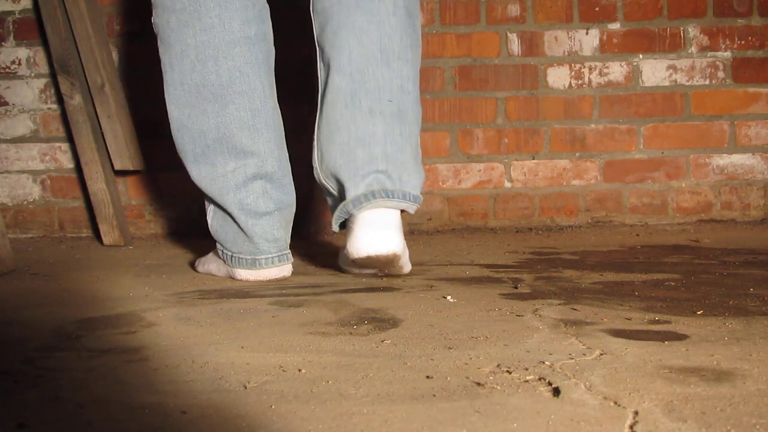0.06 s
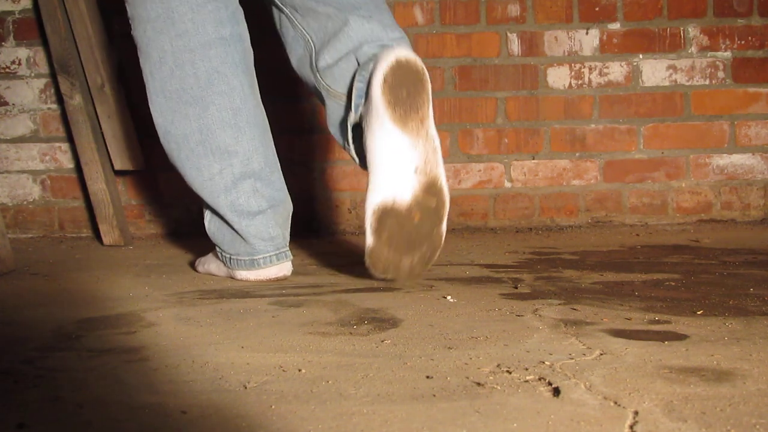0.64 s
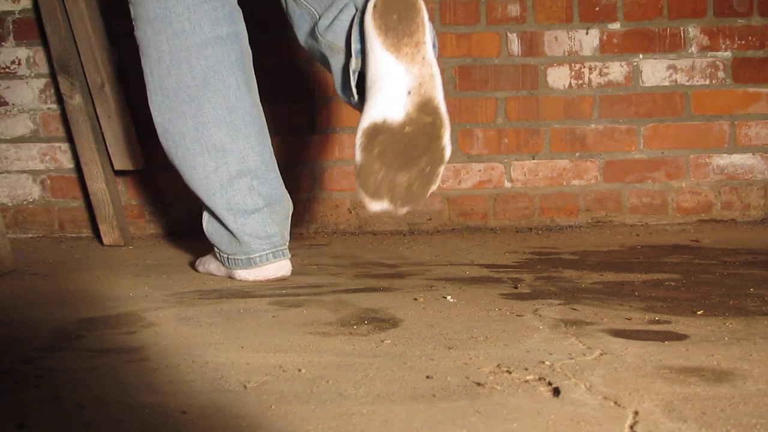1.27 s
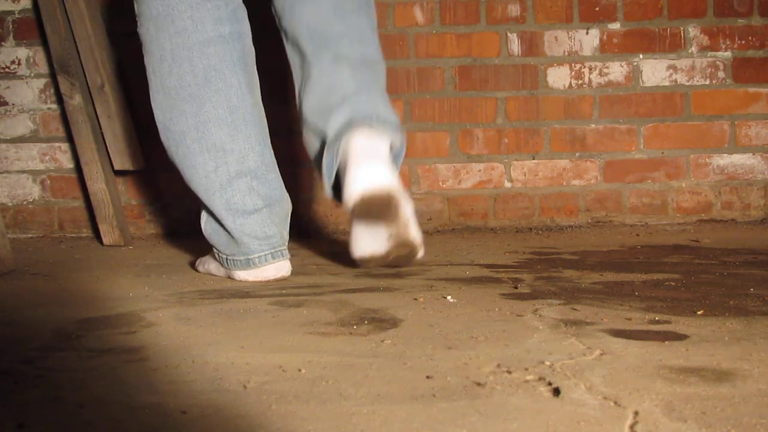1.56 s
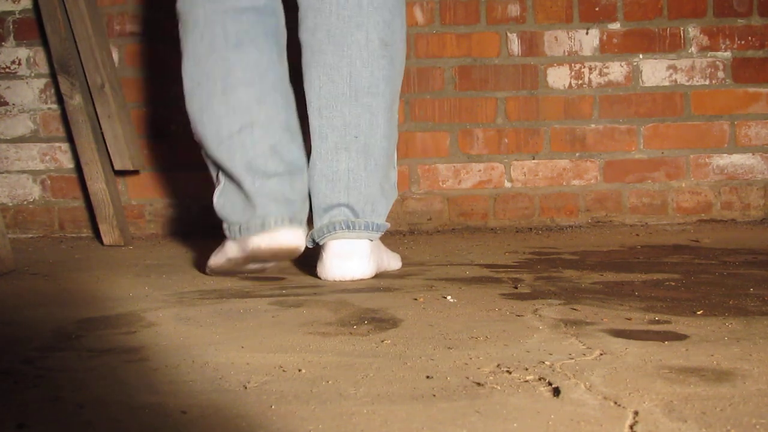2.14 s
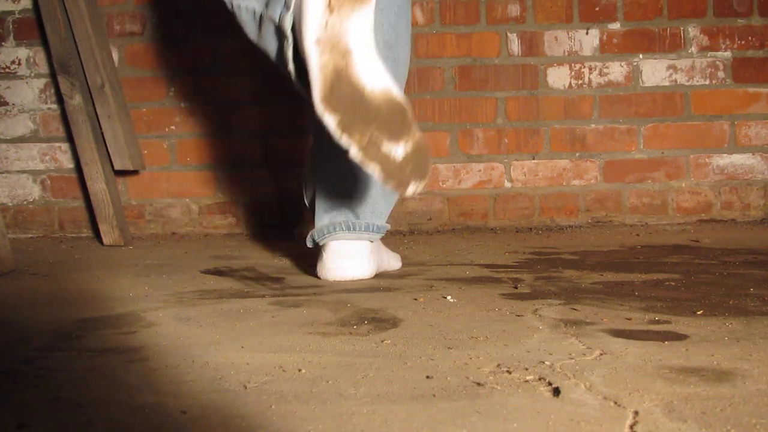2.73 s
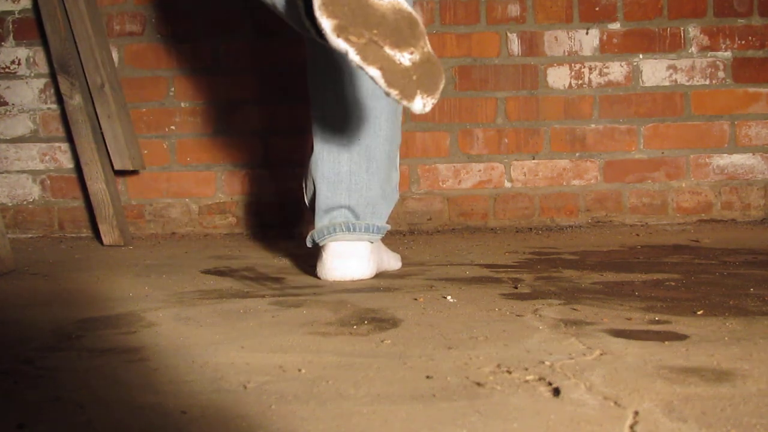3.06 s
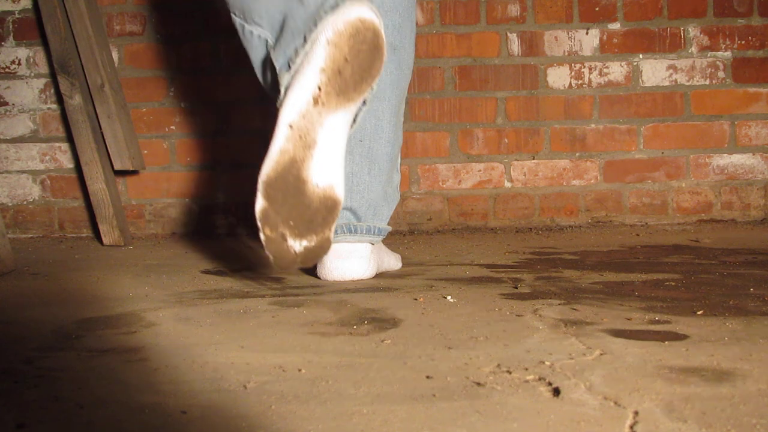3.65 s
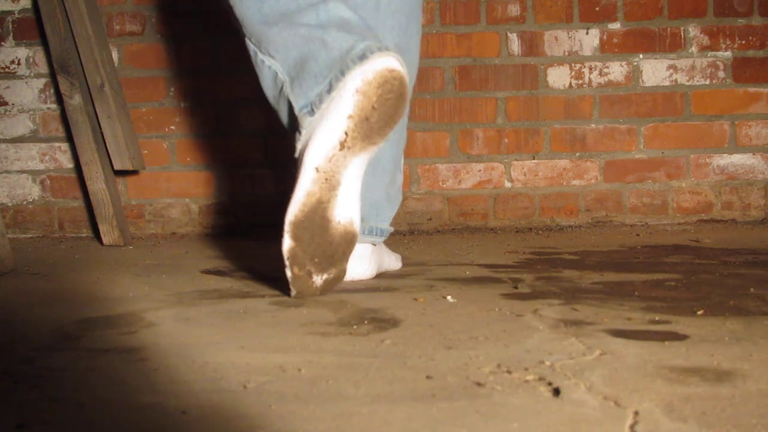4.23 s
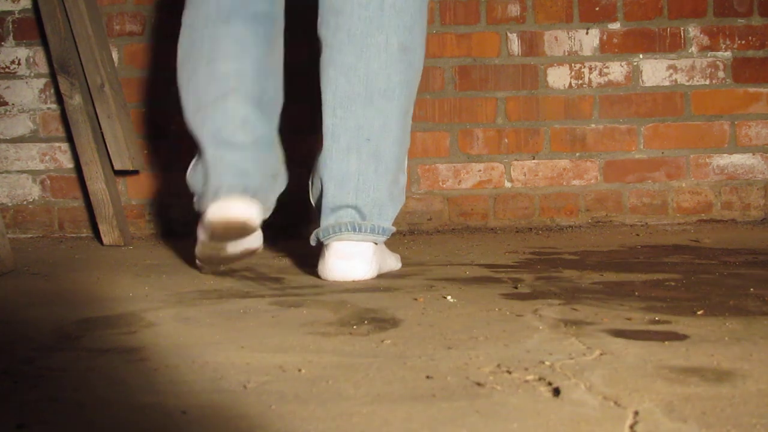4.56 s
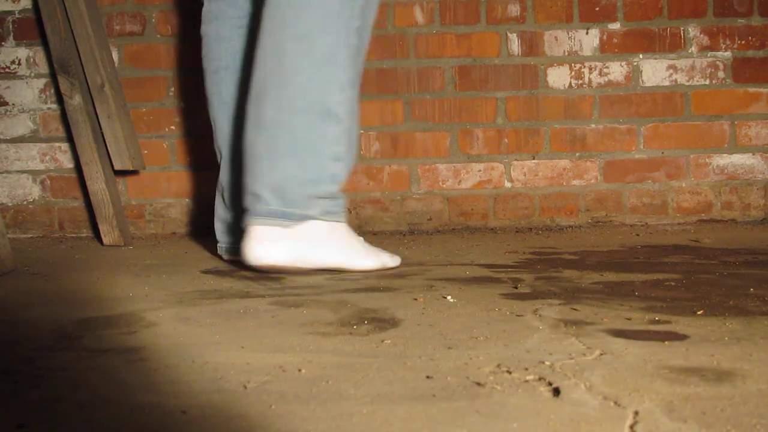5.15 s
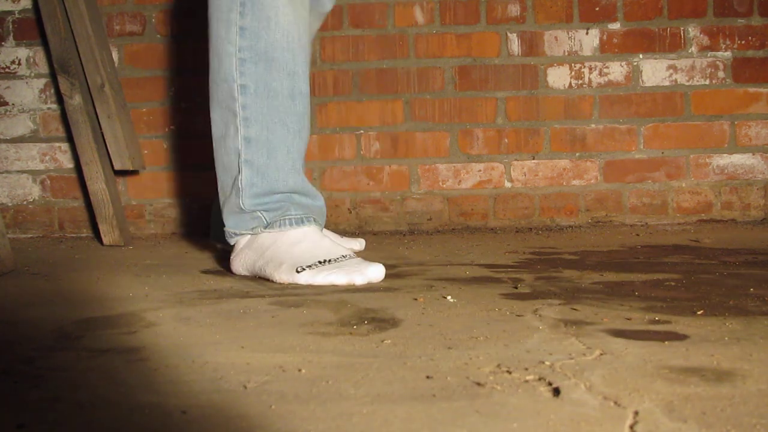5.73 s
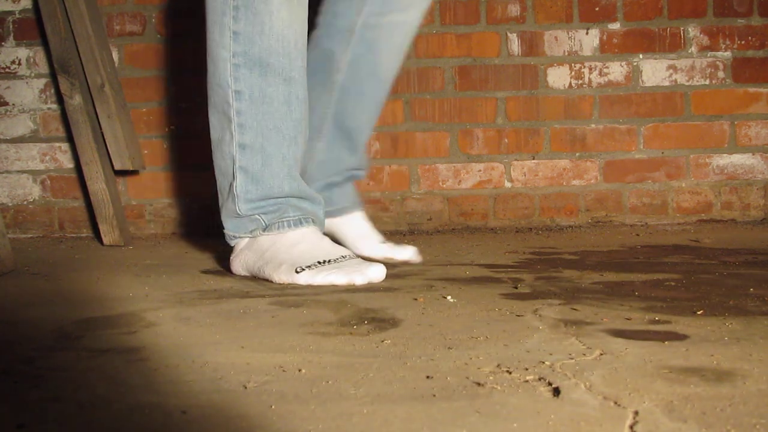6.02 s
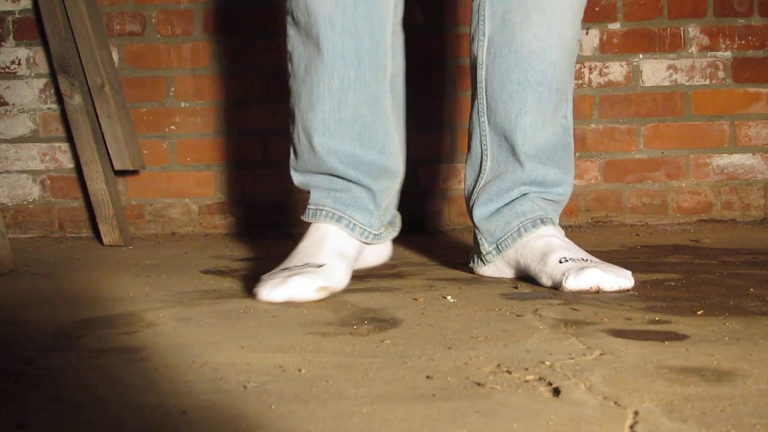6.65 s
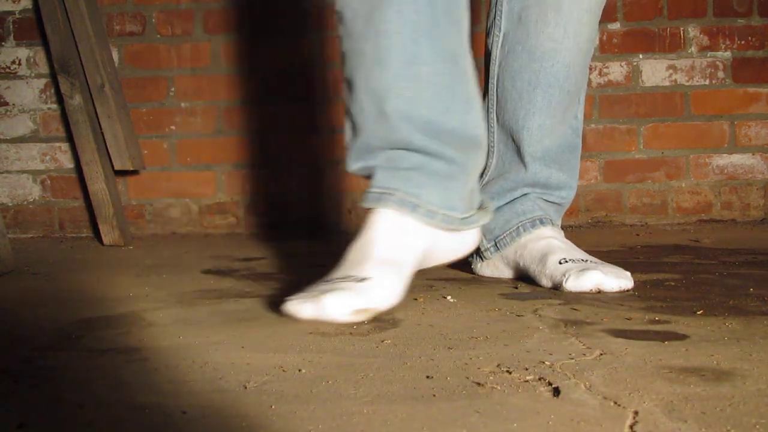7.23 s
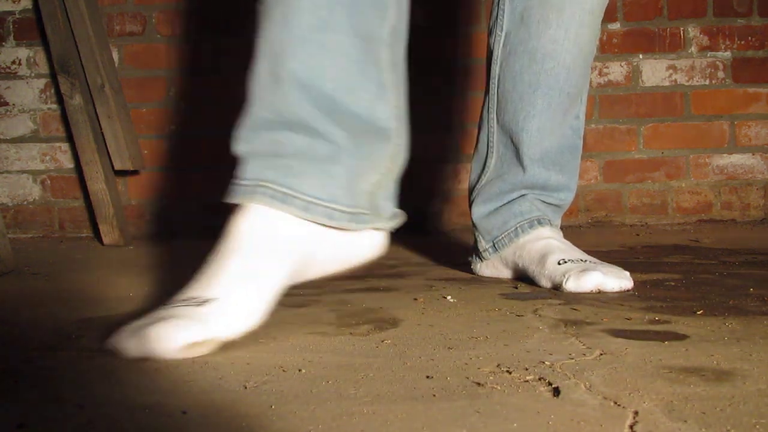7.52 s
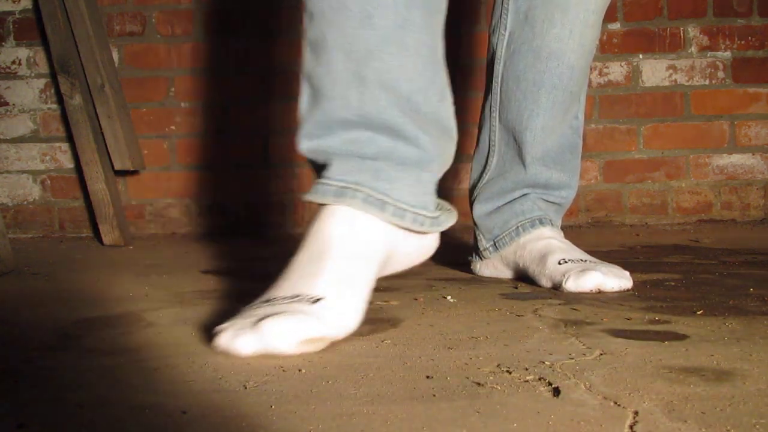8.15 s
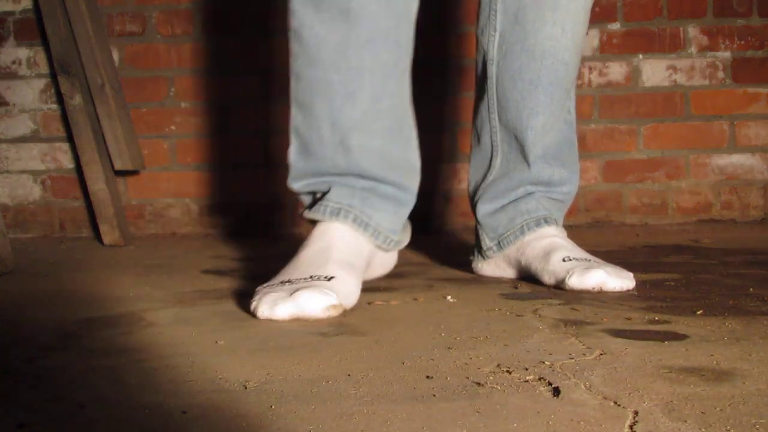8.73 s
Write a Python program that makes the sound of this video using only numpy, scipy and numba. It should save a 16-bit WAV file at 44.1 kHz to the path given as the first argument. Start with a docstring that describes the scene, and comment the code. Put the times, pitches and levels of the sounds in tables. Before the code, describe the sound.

Socked feet wipe and scuff over a dusty concrete floor in a small brick room. A few soft slides come first, with one sharp snap of grit and a louder scrape. After a lull of faint denim rustling, light scuffing steps build into a run of sandy strokes to and fro. The feet sound close, with a short ring from the walls and a fan droning faintly behind.

```python
"""Socked feet scuff over dusty concrete in a small brick room: wipes and steps, then strokes to and fro.
Cloth drags on the rough floor as countless tiny slips, coloured by the hollow gap under the foot.
Sand crunches under the sole, a grain snaps, and denim brushes as the legs swing.
A fan drones faintly behind, and the bare walls add a short ring."""
import sys
import numpy as np
from scipy import signal
from scipy.fft import rfft, irfft
from scipy.io import wavfile
from numba import njit

SR = 44100
rng = np.random.default_rng(int(sys.argv[2]) if len(sys.argv) > 2 else 0)


def digitize_waveform(pressure):
    """Quantize a signal to 16-bit integers and store it at the path in sys.argv[1].

    Rows of a 2-D input are taken as channels; values are limited to [-1, 1].
    """
    field = np.atleast_2d(pressure).T
    bounded = np.clip(field, -1, 1)
    quanta = np.round(bounded * 32767).astype(np.int16)
    wavfile.write(sys.argv[1], SR, quanta)


N = 396459
T = np.arange(N) / SR
FREQS = np.fft.rfftfreq(N, 1 / SR) + 1e-3
OPPOSED = np.array([[1], [-1]])  # side signal: plus on the left, minus on the right

# room tone EQ, mid and side: frequency_hz, gain_db
AIR_MID_EQ = [(25, -40.5), (170, -3.5), (500, -0.5), (700, 2.5), (1000, -2), (1550, -5.5), (2050, -4),
              (3100, -9.5), (4200, -17.5), (5400, -15.5), (6600, -21.5), (8300, -15), (11000, -20),
              (15400, -32)]
AIR_SIDE_EQ = [(25, -50), (80, -18), (170, -4.5), (300, -2), (700, -2), (1500, -6), (2100, -10),
               (3100, -16.5), (4200, -28), (5400, -25), (6600, -29), (8400, -25.5), (15400, -37)]
# tones of the fan's drone: pitch_hz, width_hz, level_db
FAN_TONES = [(403.7, 17.5, -64.5), (614, 20, -65.5), (807.6, 13.5, -64.5), (1095, 41, -66), (1349, 22, -72)]
# denim and sock brushing as a leg swings or turns: centre_s, length_s, level_db
LEG_SWISHES = [(.48, .09, -61), (1.39, .22, -69), (3.43, .22, -66.5), (4.294, .03, -63), (4.76, .32, -66.5),
               (4.853, .065, -50.5), (7.645, .06, -63), (8.0, 0.17, -54)]
# soft cloth rustles, and the sock rubbing faintly on the floor between strokes:
# centre_s, length_s, level_db
SOFT_RUSTLES = [(.47, .1, -55), (.72, .12, -54.5), (1.36, .22, -64), (1.88, 0.42, -56.5),
                (2.75, 0.28, -63.5), (4.78, 0.83, -60.5), (5.8, .16, -58), (6.25, .08, -53.5),
                (7.0, .1, -52.5), (8.0, .12, -54), (8.88, 0.49, -60)]
# soft bumps of leg and foot: centre_s, length_s, level_db
LEG_BUMPS = [(.8, .17, -63), (3.91, 0.13, -66), (6.34, .089, -69)]
# single grains snapping: start_s, peak_db
GRAIN_SNAPS = [(1.475, -43), (1.7725, -20), (1.774, -22.5), (1.7845, -42)]
# ring of a snapped grain: pitch_hz, width_hz, gain_db
GRAIN_RING = [(9200, 340, 6), (9900, 350, -4), (11400, 440, 0), (13400, 500, -15)]
# colour of cloth on concrete: frequency_hz, gain_db
CLOTH_EQ = [(40, -57), (200, -28.5), (450, -15.5), (850, -6), (1250, -3.5), (2000, -2), (2600, -2.5),
            (3300, -3), (4250, -9.5), (5350, -2.5), (6600, -12.5), (8000, -5), (9300, -5.5), (12300, -13),
            (15500, -30.5)]
# the sole catches and rasps briefly: centre_s, length_s, level_db
SOLE_CATCHES = [(.648, 0.032, -46.5), (1.663, 0.088, -43.5), (2.331, 0.0032, -35), (2.353, .016, -35),
                (2.385, .009, -23), (2.416, 0.031, -29.5), (5.26, .11, -49), (6.188, 0.077, -39.5)]
# slides of a sole: start_s, length_s, level_db, growth_db, sand_db, weight_db, brighten_db,
# lower_hz, upper_hz, ring_strength
# Growth and brightening run from landing to lifting; sand and weight trim the treble and the body.
# The last three are the resonances of the gap under the foot.
SOLE_SLIDES = [ (-.095, 0.24, -38.5, -20, -7, -3, -13, 1020, 1820, .9),
               (.03, .457, -42.6, -1, -5, -2.5, -1, 870, 2010, .4),
               (.484, 0.19, -46.4, 2.5, 1.5, -3, 1, 1030, 2000, .4),
               (1.607, .25, -48.8, -21.5, -4, 4, -6, 1060, 2230, 0.86),
               (2.004, 0.36, -35, 14.5, -4.5, -3.5, 4, 1150, 1920, .6),
               (2.314, 0.21, -30, 1.5, -2, -5, 4, 1100, 2260, 1.17),
               (2.43, 0.088, -42.5, -2, 7, -8, -1, 1240, 2200, .4),
               (4.508, .13, -50.4, -7.5, 2, -20, -12, 1110, 2180, 0.078),
               (5.0, .109, -55, -3, -.6, -2, -13, 1090, 1930, .4),
               (5.081, 0.33, -45.3, 5.5, -4.5, -11, -1, 1010, 2100, .2),
               (5.371, .14, -43.1, 4, -3, -13, -13, 1040, 2210, .4),
               (5.485, 0.14, -40.5, 2, -2, -2, -5, 1498, 2050, 1.4),
               (5.644, .121, -53.2, -11, -5.5, -6, -10, 1500, 1870, 1.3),
               (5.883, 0.18, -42.5, -1, -1.5, -12, 7, 950, 2010, 0.76),
               (6.026, 0.18, -41.1, 4.5, -2.2, -9, 2, 1070, 2020, .4),
               (6.267, .086, -44, 11, -4.5, -6.5, -17, 1160, 1830, .1),
               (6.361, 0.18, -51.5, 14, -1, -3, -2, 970, 2030, 1.0),
               (6.575, 0.24, -37.5, -13, -6.4, -4.5, -9, 1120, 1960, 1.0),
               (6.724, 0.25, -33.5, -6, 1.2, -7.5, -6.5, 980, 1790, 1.5),
               (7.012, .309, -35, 2.5, -6, -3.5, 5.5, 890, 1720, 0.99),
               (7.321, 0.28, -34, 9.5, -1.5, -6, 3, 1510, 2170, 0.86),
               (7.651, 0.31, -33, 8.5, -5, -.5, -3, 1472, 2140, 0.94),
               (8.032, 0.28, -34.7, 0.5, -1, -5.5, 2, 1360, 2020, .9),
               (8.259, 0.43, -34.5, 1.5, -5, 1, 2, 1200, 1890, 0.76),
               (8.653, 0.13, -44.5, -3.5, -3.5, -8, -6, 1030, 1680, 1.0)]


def undb(db):
    """Decibels to gain."""
    return 10 ** (np.asarray(db) / 20)


def unit(x):
    """Scale to rms 1."""
    return x / np.sqrt(np.mean(x ** 2))


def eq_curve(points):
    """Gain at every frequency from points of frequency_hz, gain_db."""
    hz, db = np.transpose(points)
    return undb(np.interp(np.log(FREQS), np.log(hz), db))


def filtered(x, gain):
    """Apply a frequency response."""
    return irfft(rfft(x) * gain, N)


def resonance(hz, width):
    """Response of one damped mode, gain 1 at its centre."""
    return 1 / (1 + 1j * (FREQS ** 2 - hz ** 2) / (FREQS * width))


def below(hz, order):
    """Smooth low-pass curve; one minus it is the matching high-pass."""
    return 1 / (1 + (FREQS / hz) ** order)


def noise():
    """White noise."""
    return rng.standard_normal(N)


def flutter(rate_hz):
    """Smooth random modulation, rms 1, rolling off above rate_hz."""
    return unit(filtered(noise(), below(rate_hz, order=4)))


def swells(rows):
    """Envelope of rounded swells from rows of centre_s, length_s, level_db."""
    return sum(undb(db) * np.cos(np.pi * np.clip((T - centre) / length, -.5, .5)) ** 2
               for centre, length, db in rows)


@njit
def swept_band(x, hz, width):
    """State-variable band-pass with a moving centre, gain 1 there."""
    out, band_state, low_state = np.empty(len(x)), 0., 0.
    for i in range(len(x)):
        tuning, damping = np.tan(np.pi * hz[i] / SR), width / hz[i]
        band = (band_state + tuning * (x[i] - low_state)) / (1 + tuning * (tuning + damping))
        band_state = 2 * band - band_state
        low_state += 2 * tuning * band
        out[i] = damping * band
    return out


def air_and_fan():
    """A bed of steady room tone and the rough drone of a distant fan."""
    mid = undb(-58) * unit(filtered(noise(), eq_curve(AIR_MID_EQ)))
    side = undb(-53) * unit(filtered(noise(), eq_curve(AIR_SIDE_EQ)))
    fan_mid, fan_side = [
        sum(undb(db) * unit(filtered(noise(), resonance(hz, width))) for hz, width, db in FAN_TONES)
        for _ in range(2)]
    return mid + fan_mid + OPPOSED * (side + undb(-1) * fan_side)


def brick_room(x, t60_low_s, t60_high_s, tail_db, early_db):
    """The floor and near bricks scatter the sound sideways; the walls ring briefly."""
    age = np.maximum(T - .004, 0)  # pre-delay
    low = below(4700, order=2)
    tails = [filtered(noise() * undb(-60 * age / t60_low_s), low)
             + filtered(noise() * undb(-60 * age / t60_high_s), 1 - low) for _ in range(2)]
    tail_mid, tail_side = unit(np.array(tails) * (age > 0)) / np.sqrt(N)
    scatter = unit(noise() * np.exp(-T / .006) * (T > .0005)) / np.sqrt(N)
    colour = eq_curve([(300, 4), (700, -8), (1400, -12), (2500, -6), (4500, -17), (8000, -1), (14000, 4)])
    early = undb(early_db) * rfft(scatter) * colour
    wet = undb(tail_db) * rfft(tail_mid + OPPOSED * undb(-7) * tail_side) + OPPOSED * early
    pan_right_db = np.interp(FREQS, [2000, 5000, 9000, 13000], [.1, 1.3, 2.9, 1.8])
    return filtered(x, undb(-OPPOSED * pan_right_db / 2) + wet)


def cloth_and_bumps():
    """Denim brushes, cloth rustles, the sock rubs faintly between strokes, and the legs bump dully."""
    cloth = eq_curve(CLOTH_EQ)
    swish = unit(filtered(noise(), cloth * (1 - below(2900, order=2))))
    rustle = unit(filtered(noise() * undb(3.1 * flutter(40)), cloth * below(3900, order=3)))
    thud = unit(filtered(noise(), resonance(hz=160, width=170) ** 2))
    return swish * swells(LEG_SWISHES) + rustle * swells(SOFT_RUSTLES) + thud * swells(LEG_BUMPS)


def grain_snaps():
    """A grain shoots from under the foot with a tiny, high ring."""
    clicks = np.zeros(N)
    for start, db in GRAIN_SNAPS:
        clicks[int(start * SR)] += undb(db)
    ring = sum(undb(db) * resonance(hz, width) for hz, width, db in GRAIN_RING)
    return filtered(clicks, ring / np.abs(irfft(ring, N)).max())


def sand_crackle(per_second, spread_db):
    """Crunching sand: random clicks of either sign, a few louder than the rest."""
    struck = rng.random(N) < per_second / SR
    size = undb(spread_db * np.minimum(rng.exponential(size=N), 4))
    return unit(struck * size * rng.choice([-1, 1], N))


def friction(sand_share, judder_db):
    """Fibres slip on concrete in a dense hiss while sand crackles; the sole's grip judders."""
    hiss = np.sqrt(1 - sand_share) * noise()
    crackle = np.sqrt(sand_share) * sand_crackle(per_second=5000, spread_db=1.5)
    contact = (hiss + crackle) * undb(judder_db * flutter(76))
    cloth = eq_curve(CLOTH_EQ)
    mids = (FREQS > 1265) & (FREQS < 3550)  # this band is set to about rms 1
    return filtered(contact, cloth / np.sqrt(np.mean(cloth ** 2 * mids)))


def hollow(x, lower_hz, upper_hz, strength):
    """Two broad, gliding resonances of the gap under the foot colour the scuff."""
    ring = swept_band(x, lower_hz, width=234.0) * 0.77 + swept_band(x, upper_hz, width=247.0)
    return (x + strength * ring) / np.sqrt(1 + 0.29 * strength * (2 + strength))


def footwork(body_power, rasp_power, sand_power, gap_glide):
    """Each layer follows load and a power of speed; the stronger of overlapping slides leads the gap."""
    body, rasp, sand, lower, upper, ring = np.zeros((6, N))
    for (start, length, db, growth_db, sand_db, weight_db, brighten_db,
         lower_hz, upper_hz, strength) in SOLE_SLIDES:
        place = np.clip((T - start) / length, 0, 1) - .5  # -.5 at landing, .5 at lifting
        speed = 1 - (2 * place) ** 2
        load_db, tilt_db = db + growth_db * place, brighten_db * place
        rubbing = speed ** rasp_power * undb(load_db)
        rasp += rubbing
        body += speed ** body_power * undb(load_db + weight_db - tilt_db)
        sand += speed ** sand_power * undb(load_db + sand_db + tilt_db)
        glide = 1 + gap_glide * (speed - 1)  # the gap's pitch rises with speed
        lower += rubbing * glide * lower_hz
        upper += rubbing * glide * upper_hz
        ring += rubbing * strength
    sliding = rasp > 0
    gap = [np.interp(T, T[sliding], total[sliding] / rasp[sliding]) for total in (lower, upper, ring)]
    return body, rasp, sand, gap


def feet():
    """The scuff in three layers: low body from the sole's weight, a mid rasp and a sandy top."""
    body_level, rasp_level, sand_level, gap = footwork(
        body_power=0.84, rasp_power=0.93, sand_power=0.78, gap_glide=0.028)
    contact = friction(sand_share=0.46, judder_db=0.47)
    ringing = hollow(contact, *gap)
    low, high = below(1330, order=5), 1 - below(5150, order=3)
    body = filtered(ringing, low) * body_level * undb(0.1)
    rasp = filtered(ringing, 1 - low - high) * (rasp_level + swells(SOLE_CATCHES)) * undb(0.25)
    sand = filtered(contact, high) * sand_level * undb(-0.37)
    return body + rasp + sand


def scene():
    """Feet, grains and cloth in the room, over a bed that leans slightly right."""
    bed = air_and_fan() * undb(OPPOSED * -.6)
    foley = feet() + grain_snaps() + cloth_and_bumps()
    return brick_room(foley, t60_low_s=0.44, t60_high_s=0.21, tail_db=-11.5, early_db=-7.5) + bed


def record(dry):
    """A steep high cut at 15.8 kHz."""
    return signal.sosfilt(signal.ellip(10, .1, 80, 15800, fs=SR, output="sos"), dry)


dry = scene()
out = record(dry)
digitize_waveform(out)
```